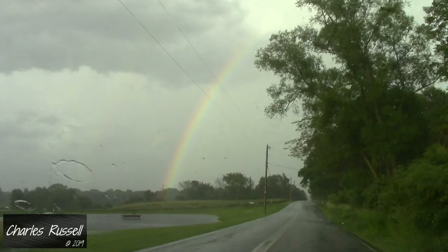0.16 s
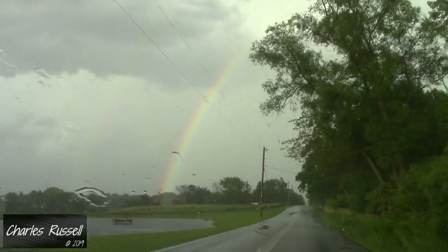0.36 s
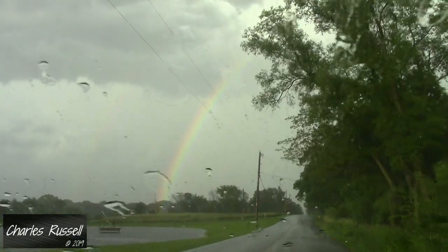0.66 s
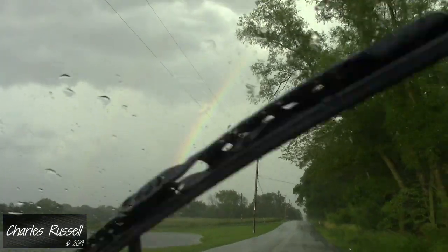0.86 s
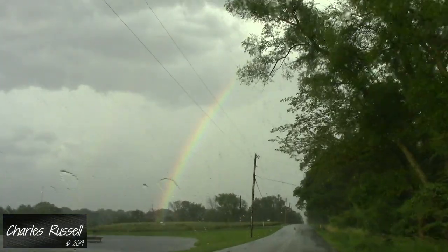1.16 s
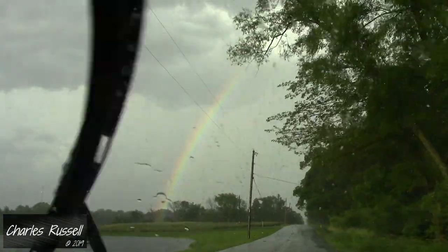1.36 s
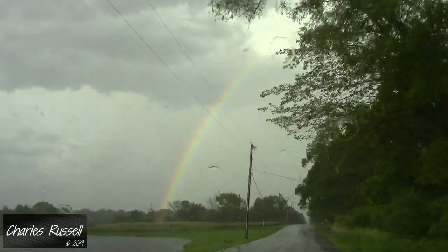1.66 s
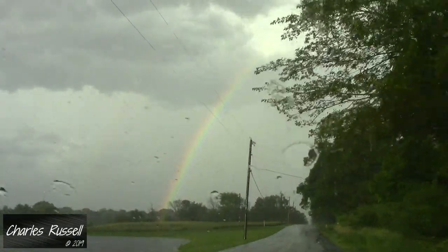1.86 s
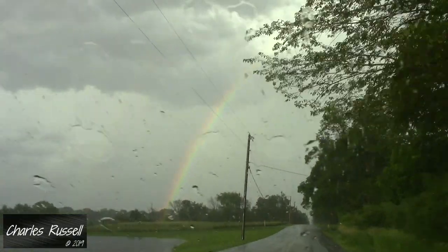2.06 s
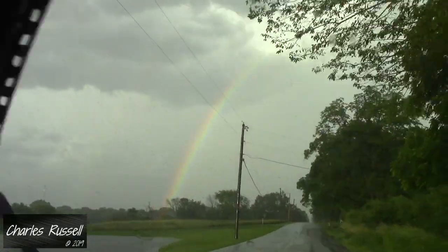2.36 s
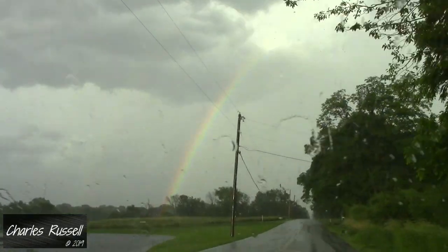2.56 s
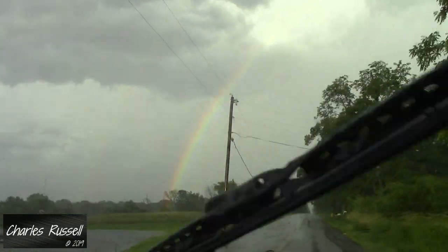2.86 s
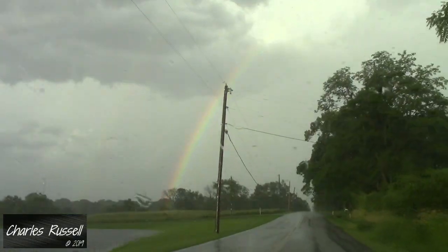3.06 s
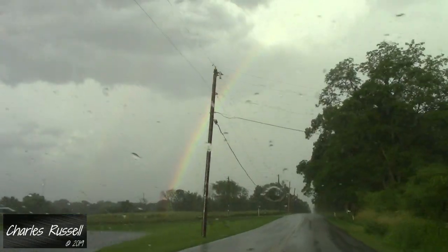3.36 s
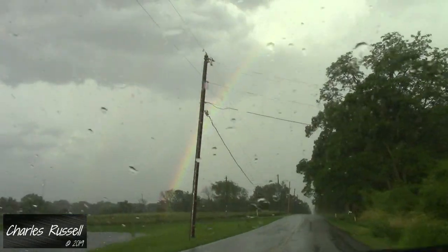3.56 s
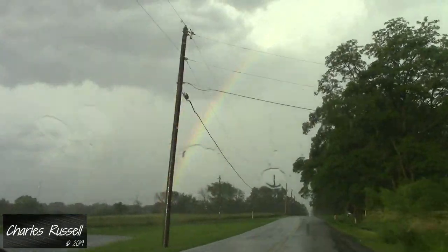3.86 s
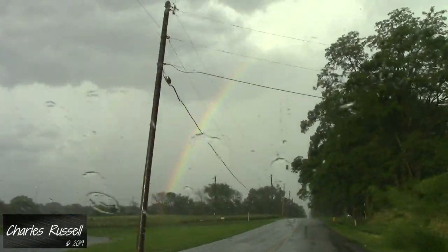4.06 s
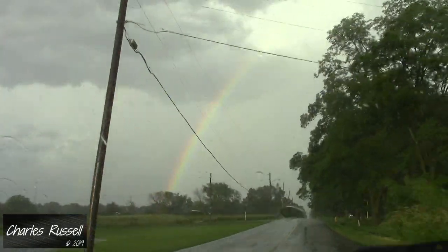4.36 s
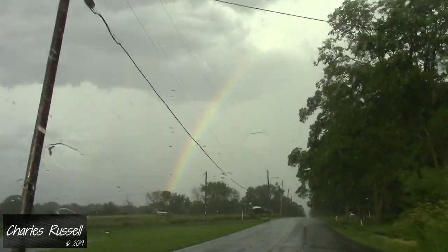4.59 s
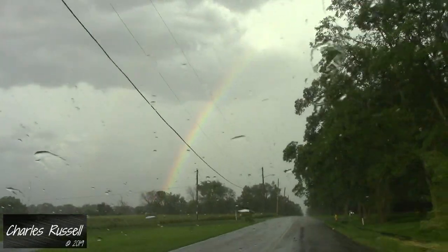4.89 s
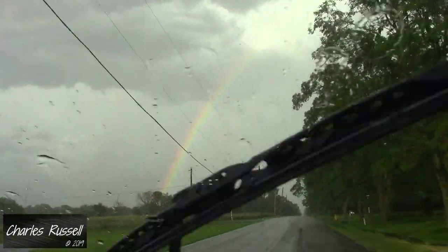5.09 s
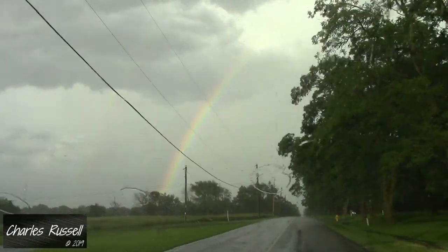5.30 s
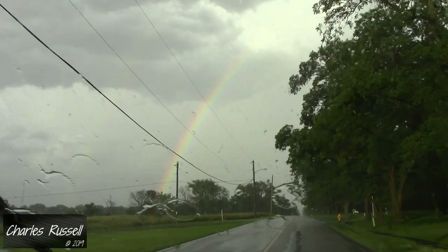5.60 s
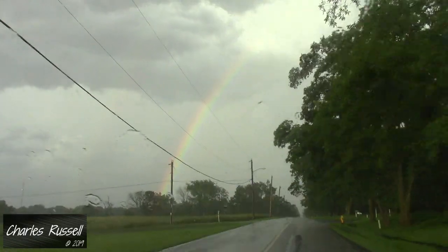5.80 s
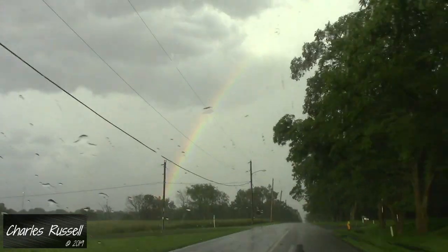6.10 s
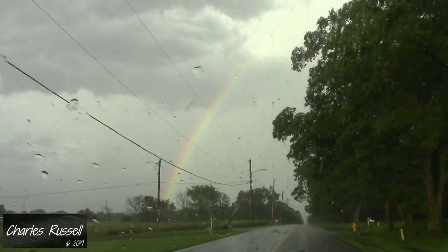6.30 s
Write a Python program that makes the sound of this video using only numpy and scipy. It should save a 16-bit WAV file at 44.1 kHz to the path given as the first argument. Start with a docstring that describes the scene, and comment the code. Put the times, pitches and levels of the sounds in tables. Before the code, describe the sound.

Rain and small hail patter on a moving car's windshield, close to a microphone in the cabin, with a fine sizzle and bright, irregular ticks. Underneath runs a deep tyre and road rumble, broken by a few low jolts. The wipers give a regular hollow thump, strongest on the first two sweeps. Midway, a flurry of hailstones knocks dully on the roof, then the lighter ticking carries on.

```python
"""Driving through rain and small hail

Inside a car on a wet country road. Road boom fills the cabin, swelling on rough surface and at bumps;
the body thuds now and then and the wipers knock once a sweep. Drops and ice pellets tick on the
windshield, and bigger hailstones knock on the lined roof."""
import sys
import numpy as np
from scipy import signal
from scipy.fft import rfft, irfft, next_fast_len
from scipy.io import wavfile
from scipy.ndimage import uniform_filter1d

SR = 44100
rng = np.random.default_rng(int(sys.argv[2]) if len(sys.argv) > 2 else 0)


def to_wav(sig):
    """Store sig (one row per channel, or 1-D mono) as 16-bit WAV at the path in sys.argv[1].

    Samples outside -1..1 are clipped; the rate is SR.
    """
    pcm = np.clip(np.atleast_2d(sig), -1, 1) * 32767
    pcm = np.round(pcm).astype(np.int16)
    wavfile.write(sys.argv[1], SR, pcm.T)  # frames by channels


N = 284004
TIME_S = np.arange(N) / SR
FFT_SIZE = next_fast_len(N + 8192)
FREQ_HZ = np.fft.rfftfreq(FFT_SIZE, 1 / SR)

# shower strength: t/s, level/dB
SHOWER_LEVEL = [(0.0, -27), (0.12, -28.5), (2.01, -29.5), (2.22, -34.5), (2.44, -33.5), (2.67, -31),
                (2.82, -38.5), (3.25, -33), (3.91, -33.5), (4.3, -28), (4.82, -33), (5.27, -31.5),
                (5.65, -32), (6.44, -29.5)]
# modes of cabin air and panels: f/Hz, width/Hz, height/dB
CABIN_MODES = [(132.6, 25, 9), (159.3, 54, 3.5), (223.5, 2.7, 2.5), (337.6, 20, 6.5), (359.5, 11.6, 5),
               (546, 26.5, 4.5), (747, 44, 7.5), (1040, 11, 9.5)]
# low cut on body thuds: f/Hz, level/dB
THUD_LOW_CUT = [(30, -15), (70, -13), (115, 4)]
# windshield ring: f/Hz, level/dB
GLASS_SPECTRUM = [(150, -37), (500, 0), (900, 7.5), (1400, 3), (2200, 2), (3100, 1.5), (3900, -2.5),
                  (4700, -7.5), (7000, -13), (11000, -22), (16000, -57)]
# splash of water and ice: f/Hz, level/dB
SPLASH_SPECTRUM = [(800, -37), (2500, 10.5), (4200, 4), (5400, 5.5), (7800, 1.5), (9200, -3), (11000, -5),
                   (13000, -10), (16000, -23)]


def gain_of(db):
    """Decibels to amplitude."""
    return 10 ** (np.asarray(db) / 20)


def unit_rms(x):
    """Scale to rms 1."""
    return x / np.sqrt(np.mean(abs(x) ** 2) + 1e-20)


def curve_db(spectrum):
    """(f/Hz, level/dB) rows to dB per FFT bin."""
    hz, db = np.transpose(spectrum)
    return np.interp(np.log(FREQ_HZ + 1), np.log(hz), db)


def envelope(rows):
    """(t/s, level/dB) rows to gain per sample."""
    t_s, db = np.transpose(rows)
    return gain_of(np.interp(TIME_S, t_s, db))


def add(mix, t_s, sound):
    """Add a sound to the mix at t_s."""
    part = mix[..., max(round(t_s * SR), 0):][..., :sound.shape[-1]]
    part += sound[..., :part.shape[-1]]


def colour(x, response_db):
    """Minimum-phase filter, scaled to keep the power of white noise."""
    log_gain = np.log(unit_rms(gain_of(response_db)))
    cepstrum = irfft(log_gain, FFT_SIZE)
    phase = rfft(2 * cepstrum * (np.arange(FFT_SIZE) < FFT_SIZE // 2)).imag
    return irfft(rfft(x, FFT_SIZE) * np.exp(log_gain + 1j * phase), FFT_SIZE)[..., :N]


def impact(rise_s, decay_s, tail_db, tail_t60_s=.075):
    """Mid and side of one hit: a dense, quickly damped ring and its cabin echo."""
    t = np.arange(3000) / SR
    echo = gain_of(tail_db - 60 * t / tail_t60_s)
    shape = (1 - np.exp(-t / rise_s)) * (np.exp(-t / decay_s) + echo)
    return shape / shape.max() * rng.standard_normal((2, len(t)))


def patch_resonance(x, hz):
    """A struck patch of panel favours one broad resonance."""
    b, a = signal.iirpeak(np.clip(hz, 200, 14000), Q=1.6, fs=SR)
    return .65 * (x + signal.lfilter(b, a, x))


def rumble(spectrum, gain):
    """Road noise coloured by the cabin modes, levelled so that gain alone sets the slow swell."""
    modes_db = sum(db / (1 + (2 * (FREQ_HZ - hz) / width_hz) ** 2) for hz, width_hz, db in CABIN_MODES)
    noise = colour(rng.standard_normal((2, N)), curve_db(spectrum) + modes_db)
    running_rms = np.sqrt(uniform_filter1d(noise ** 2, size=7000, axis=1))
    return gain * noise / running_rms


def bump_swell(times_s, peaks_db, rise_s):
    """Gain from bumps: each peaks after rise_s and dies away; their powers add."""
    power = np.zeros(N)
    age = np.arange(SR) / SR / rise_s
    for t_s, db in zip(times_s, peaks_db):
        add(power, t_s, (gain_of(db) * age * np.exp(1 - age)) ** 2)
    return np.sqrt(power)


def road(shudder_db=-40, boom_db=-18.5, roar_db=-19, asphalt_db=-16):
    """Wheels shake the body; roughness raises the deep shudder most, the tyre roar least."""
    # surface roughness: t/s, level/dB (asphalt_db on ordinary asphalt)
    surface = [(0.0, -16), (0.52, -15), (1.31, -15), (1.7, -12), (1.85, -11.5), (2.01, -15), (2.24, -18.5),
               (2.96, -18), (3.32, -17), (3.8, -18), (4.23, -10), (4.34, -12.5), (4.5, -15.5),
               (4.73, -20.5), (5.11, -17), (5.63, -20), (6.06, -17), (6.44, -18.5)]
    # road bumps: t/s, suspension shudder/dB, cabin boom/dB
    bumps = [(0.48, -30, -19), (1.283, -26, -9.5), (1.479, -20, -13.5), (1.68, -38, -14.5),
             (3.79, -31, -13), (4.01, -21, -15.5), (4.39, -43, -14.5), (5.825, -42, -13), (6.04, -35, -16)]
    # suspension shudder, cabin boom, tyre roar, boom of a bump: f/Hz, level/dB
    shudder_spectrum = [(10, 13), (25, -12), (36, -5), (46, -1), (56, 9), (70, -2), (100, -35), (200, -51)]
    boom_spectrum = [(40, -46), (65, -20), (90, -11), (125, -1.5), (190, 0), (240, -9), (330, -14.5),
                     (700, -63)]
    roar_spectrum = [(100, -39), (170, -8), (230, 2.5), (300, -1.5), (400, -1.5), (520, -6.5), (700, -12),
                     (1000, -16.5), (1500, -26), (3000, -30), (16000, -119)]
    bump_spectrum = [(40, -24), (65, -19.5), (90, -1.5), (125, 2), (190, 0.5), (240, -13), (330, -8.5),
                     (700, -56.5)]
    roughness = envelope(surface) / gain_of(asphalt_db)
    bump_s, bump_shudder_db, bump_boom_db = np.transpose(bumps)
    shudder_swell = bump_swell(bump_s, bump_shudder_db, rise_s=.045)
    shudder = rumble(shudder_spectrum, np.hypot(gain_of(shudder_db) * roughness ** 1.5, shudder_swell))
    boom = rumble(boom_spectrum, gain_of(boom_db) * roughness ** 1.25)
    roar = rumble(roar_spectrum, gain_of(roar_db) * roughness ** .84)
    bump_boom = rumble(bump_spectrum, bump_swell(bump_s, bump_boom_db, rise_s=.033))
    return shudder + boom + roar + bump_boom


def thud(upper_db, damping, rise_s=.00076):
    """A blow to the body rings the cabin modes; a sharper one reaches the upper panel modes."""
    t = np.arange(SR // 4) / SR
    hz, width_hz, height_db = np.transpose(CABIN_MODES)[:, :, None]
    weight = gain_of(height_db + upper_db * (hz > 200)) * np.minimum(1, (400 / hz) ** 2)
    cycles = hz * t * rng.uniform(.83, 1.04, hz.shape) + rng.random(hz.shape)
    decay = np.exp(-damping * np.pi * width_hz * t)
    ring = (weight * decay * np.sin(2 * np.pi * cycles)).sum(0)
    ring *= 1 - np.exp(-t / rise_s)
    return ring / abs(ring).max()


def body_thuds():
    """Low thuds: road jolts and, at 3.233 s, the wiper linkage ending its third sweep."""
    # blows to the body: t/s, level/dB, relative level of upper modes/dB
    blows = [(1.296, -3, -28), (1.496, -10, -5), (3.233, -7, -10), (3.328, -6.5, 2), (4.404, -6, 5),
             (5.849, -7, -14)]
    thuds = np.zeros((2, N))
    for t_s, db, upper_db in blows:
        add(thuds[0], t_s, gain_of(db) * thud(upper_db, damping=1.24))
    return colour(thuds, curve_db(THUD_LOW_CUT))


def wipers(first_s=.3705, period_s=1.425, clack_db=-9):
    """At the end of a sweep the linkage thuds, the blades flip with a clack and the arms settle."""
    # knock of each sweep: level/dB
    sweeps_db = [1, -0.5, -7.5, -4.5, -6]
    # hollow blade clack: f/Hz, level/dB
    blade_spectrum = [(150, -8.5), (450, 11), (800, 0), (1150, 3.5), (1500, -5), (1800, 2), (2200, -5),
                      (3200, -8.5), (5000, -20.5), (16000, -43)]
    linkage, flip, settle = (-.0117, -6), (0, -4), (.016, -7)  # delay/s, level/dB
    thuds, clacks = np.zeros((2, 2, N))
    for sweep, db in enumerate(sweeps_db):
        t_s = first_s + sweep * period_s
        for delay_s, blow_db in (linkage, flip, settle):
            add(thuds[0], t_s + delay_s, gain_of(db + blow_db) * thud(upper_db=5, damping=3.1))
        add(clacks, t_s, gain_of(db + clack_db) * impact(rise_s=.0027, decay_s=.0067, tail_db=-30))
    return colour(thuds, curve_db(THUD_LOW_CUT)) + colour(clacks, curve_db(blade_spectrum))


def drops(per_s, spread_db, splash_spread_db, ring_db, splash_db, patches=36):
    """Random drops on the windshield; each patch of glass has its own ring and splash."""
    rings, splashes = np.zeros((2, 2, N))
    for _ in range(patches):
        ring = impact(rise_s=.0002, decay_s=.003, tail_db=-20)
        ring = patch_resonance(ring, hz=rng.uniform(1400, 4800))
        splash = impact(rise_s=.0002, decay_s=.0014, tail_db=-20)
        splash = patch_resonance(splash, hz=rng.uniform(4000, 11000))
        times_s = np.cumsum(rng.exponential(1, 400)) * patches / per_s
        scatter = np.clip(rng.standard_normal((len(times_s), 2)), -3, 1.6)
        for t_s, (size, brightness) in zip(times_s[times_s < TIME_S[-1]], scatter):
            add(rings, t_s, gain_of(spread_db * size) * ring)
            add(splashes, t_s, gain_of(spread_db * size + splash_spread_db * brightness) * splash)
    glass = gain_of(ring_db) * unit_rms(colour(rings, curve_db(GLASS_SPECTRUM)))
    water = gain_of(splash_db) * unit_rms(colour(splashes, curve_db(SPLASH_SPECTRUM)))
    return glass + water


def rain():
    """Dense sizzle of fine rain plus separate ticks of fat drops."""
    fine = drops(per_s=800, spread_db=3.8, splash_spread_db=3, ring_db=-.3, splash_db=-13.5)
    fat = drops(per_s=60, spread_db=2.5, splash_spread_db=3.5, ring_db=-2.2, splash_db=-11)
    return envelope(SHOWER_LEVEL) * (fine + fat)


def sleet(gain_db=1, spread_db=5.5, grains=230):
    """Tiny ice grains: short, dry, random ticks, louder as the shower grows."""
    times_s = rng.random(grains) * TIME_S[-1]
    sizes = np.minimum(rng.standard_normal(grains), 2)
    ticks = np.zeros((2, N))
    for t_s, size in zip(times_s, sizes):
        tick = impact(rise_s=.0001, decay_s=.00033, tail_db=-14)
        add(ticks, t_s, gain_of(gain_db + spread_db * size) * tick)
    return envelope(SHOWER_LEVEL) * colour(ticks, curve_db(SPLASH_SPECTRUM))


def ice_pellets(snap_db=-2.5, fragment_db=-14, fragments=3, spatter_s=.015):
    """Pellets ring the windshield, burst with a bright snap and scatter fragments."""
    # pellet hits: t/s, splash/dB, glass ring/dB
    hits = [(0.0436, -8.5, -17), (0.3102, -22, -23), (0.602, -19, -28), (0.624, -25, -15.5),
            (0.6579, -14, -24), (0.712, -11, -14.5), (0.7652, -17, -19), (0.7937, -20, -18),
            (0.855, -22, -15), (0.8668, -21, -15), (0.9026, -18, -21), (0.949, -24, -15),
            (0.9842, -17, -16), (1.0112, -15.5, -25), (1.222, -17, -37), (1.5356, -29, -15.5),
            (2.0259, -24, -11), (2.086, -10, -18), (2.2204, -22.5, -17), (2.5348, -16, -14),
            (2.6184, -21, -20), (2.683, -15, -17), (2.6946, -24, -16), (2.7498, -24, -10.5),
            (2.7985, -23, -22), (2.9608, -18, -21), (3.0071, -17, -19), (3.3027, -24, -21),
            (3.6047, -20, -24), (4.402, -9, -21), (4.4716, -16, -17), (5.0382, -20, -20),
            (5.0567, -17, -17.5), (5.1206, -21, -28), (5.2115, -17, -19), (5.297, -21, -18),
            (5.35, -18.5, -23), (5.6236, -15.5, -19), (5.6488, -20, -22), (5.7309, -12, -13),
            (6.1893, -15, -21), (6.4146, -11.5, -19)]
    rings, splashes = np.zeros((2, 2, N))
    for t_s, splash_db, ring_db in hits:
        ring = impact(rise_s=.0004, decay_s=.003, tail_db=-17)
        add(rings, t_s, gain_of(ring_db) * patch_resonance(ring, hz=rng.uniform(2400, 4200)))
        snap = impact(rise_s=.0004, decay_s=.0011, tail_db=-21)
        add(splashes, t_s, gain_of(splash_db + snap_db) * snap)
        for delay_s in spatter_s * rng.random(fragments):
            fragment = impact(rise_s=.0001, decay_s=.00037, tail_db=-41)
            add(splashes, t_s + delay_s, gain_of(splash_db + fragment_db) * fragment)
    return colour(rings, curve_db(GLASS_SPECTRUM)) + colour(splashes, curve_db(SPLASH_SPECTRUM))


def hailstones(gain_db=-2, crack_db=-4):
    """Hail on the roof: a brief crack, then a knock dulled by the lining."""
    # roof hits: t/s, level/dB, patch resonance f/Hz
    hits = [(0.415, -14, 795), (0.819, -10, 2610), (0.984, -5.5, 2940), (1.422, -11, 880),
            (2.027, -7.5, 1070), (2.562, -12, 2540), (2.657, -8, 1090), (2.786, -5.5, 1240),
            (2.824, -11.5, 1010), (2.859, -11, 851), (2.96, -8.5, 1300), (3.028, -12.5, 802),
            (3.045, -10, 2220), (3.078, -13, 2000), (3.118, -7, 1290), (3.18, -8.5, 1230),
            (4.281, -11.5, 1330)]
    # lined roof: f/Hz, level/dB
    roof_spectrum = [(100, -21), (300, 10.5), (700, 3), (1200, -4), (1900, -1), (3100, -1), (4000, -10),
                     (6000, -16.5), (10000, -27), (16000, -51)]
    knocks = np.zeros((2, N))
    for t_s, db, hz in hits:
        decay_s = .0044 * np.sqrt(1400 / hz)  # low patches ring longer
        knock = patch_resonance(impact(rise_s=.00095, decay_s=decay_s, tail_db=-11), hz)
        crack = impact(rise_s=.0002, decay_s=.0008, tail_db=-30)
        add(knocks, t_s, gain_of(db + gain_db) * (knock + gain_of(crack_db) * crack))
    return colour(knocks, curve_db(roof_spectrum))


def scene():
    """All sources at two close capsules: mono bass, slight width in the treble."""
    # stereo width: f/Hz, side gain/dB
    width = [(60, -38), (130, -58), (250, -39), (500, -26), (1000, -21), (2000, -19), (4400, -13.5),
             (8000, -12.5), (15000, -17)]
    mid, side = road() + body_thuds() + wipers() + rain() + sleet() + ice_pellets() + hailstones()
    side = irfft(rfft(side, FFT_SIZE) * gain_of(curve_db(width)), FFT_SIZE)[:N]
    return np.array([mid + side, mid - side])


def record(dry):
    """Soft peak limiter, then low-pass."""
    knee, headroom, cutoff_hz = .6, .36, 16100
    excess = np.maximum(abs(dry) - knee, 0)
    limited = np.sign(dry) * (abs(dry) - excess + headroom * np.tanh(excess / headroom))
    low_pass = signal.firwin(511, cutoff_hz, window=("kaiser", 9), fs=SR)
    return signal.oaconvolve(limited, low_pass[None], "same", axes=1)


dry = scene()
out = record(dry)
to_wav(out)
```